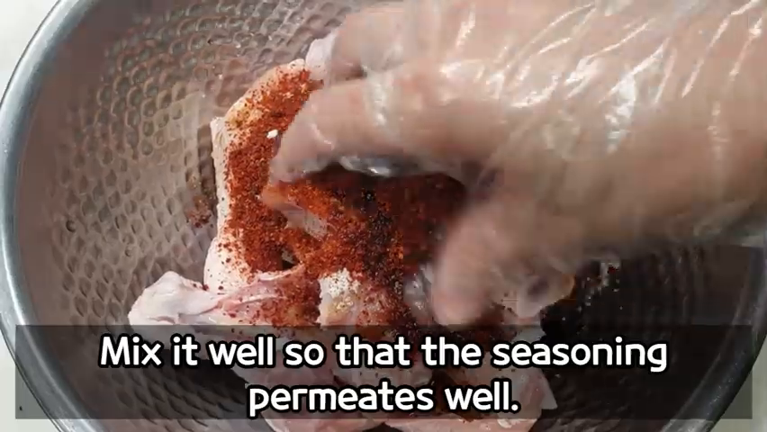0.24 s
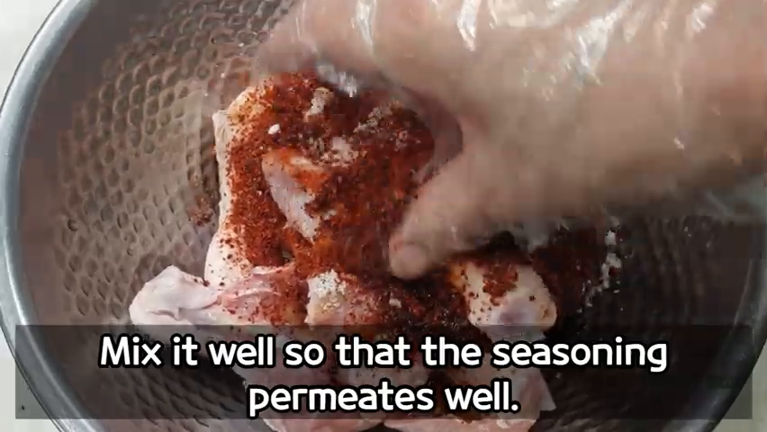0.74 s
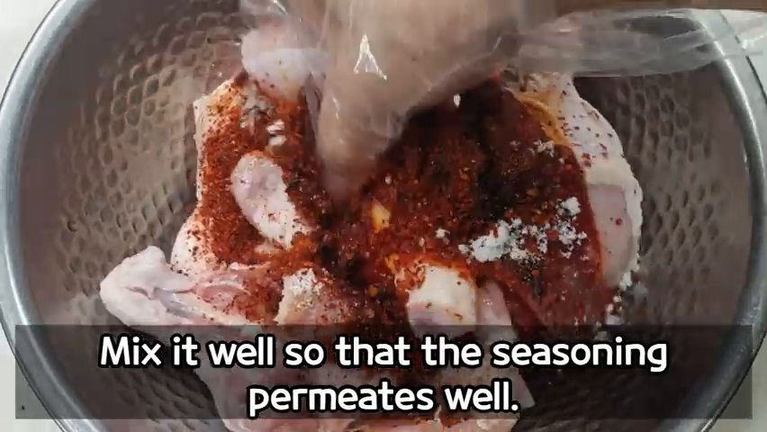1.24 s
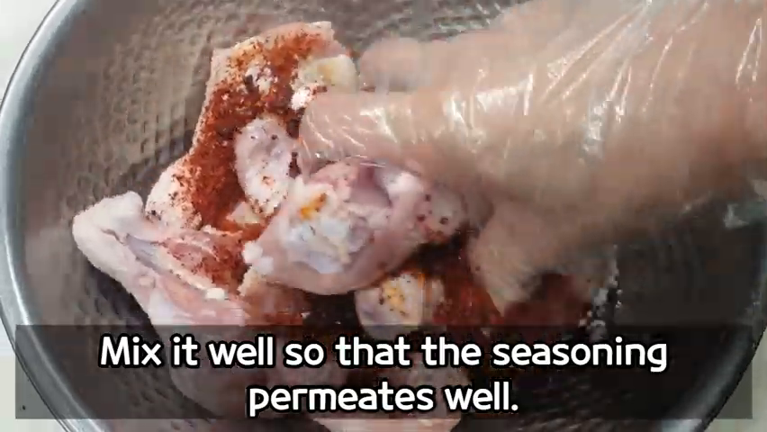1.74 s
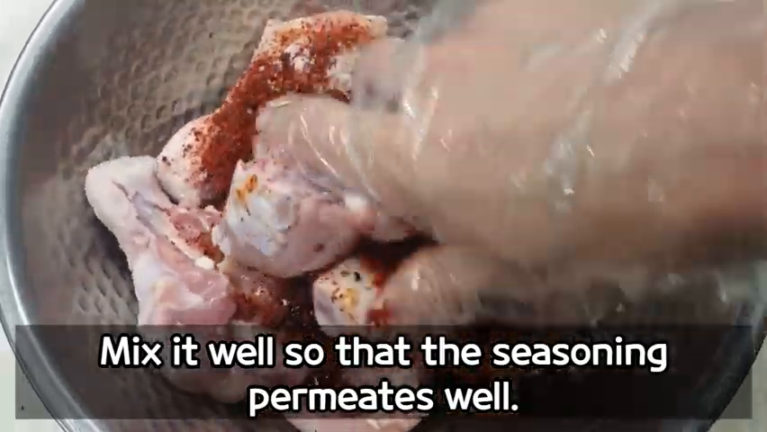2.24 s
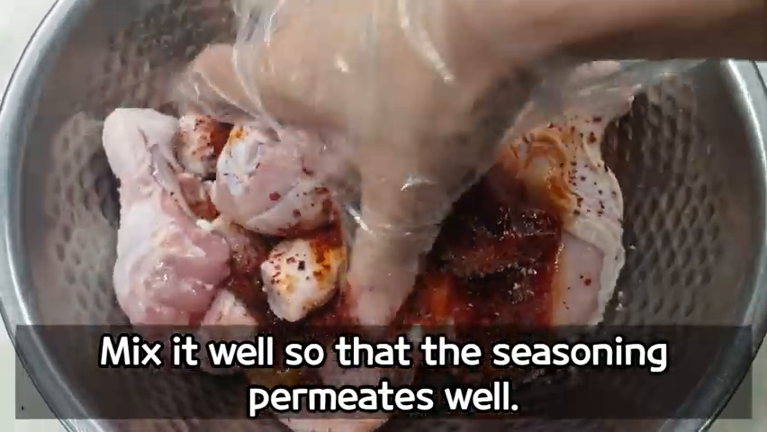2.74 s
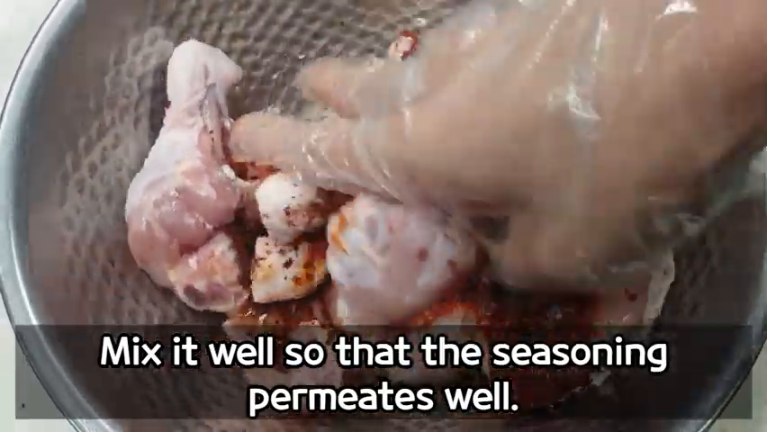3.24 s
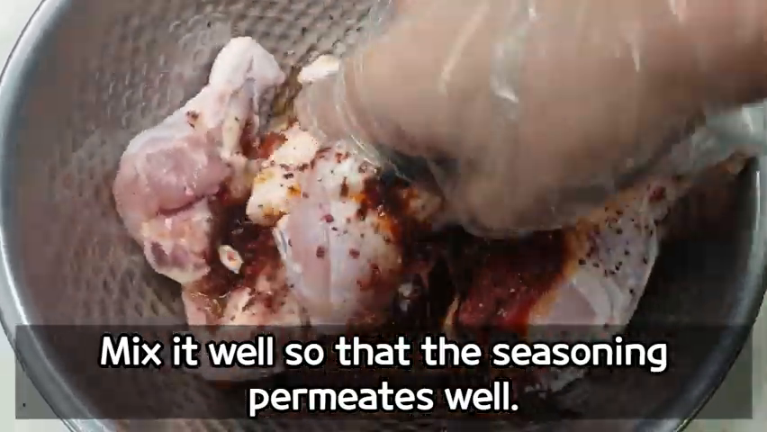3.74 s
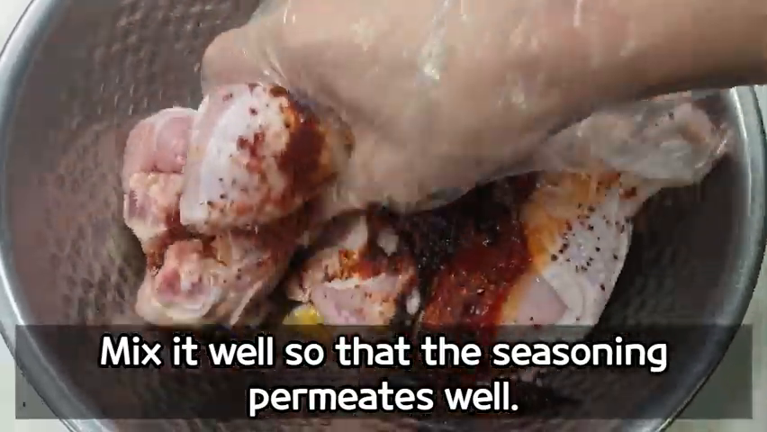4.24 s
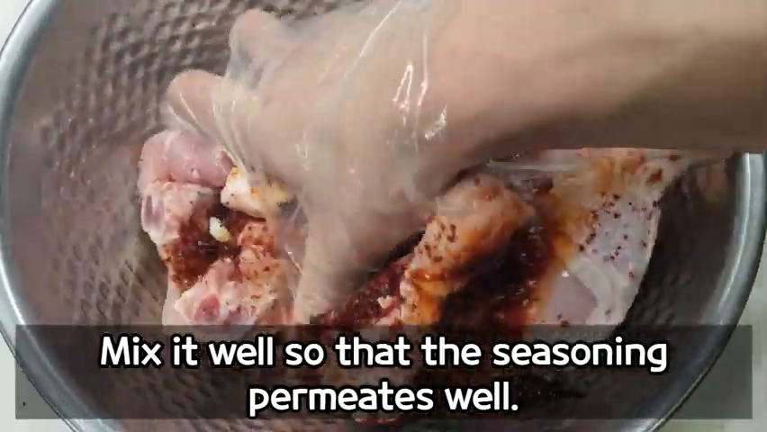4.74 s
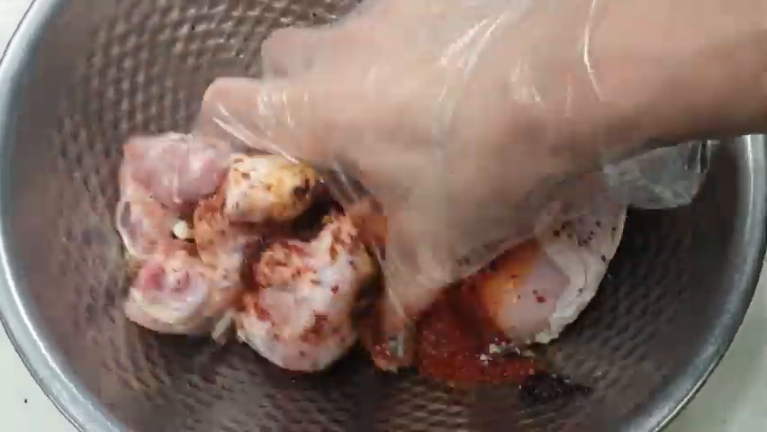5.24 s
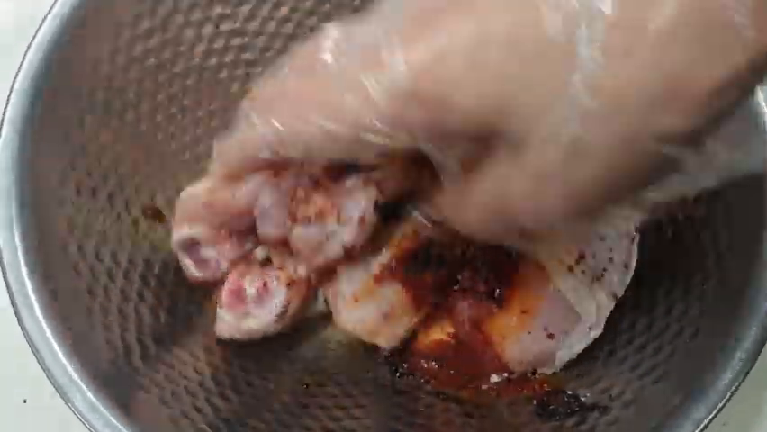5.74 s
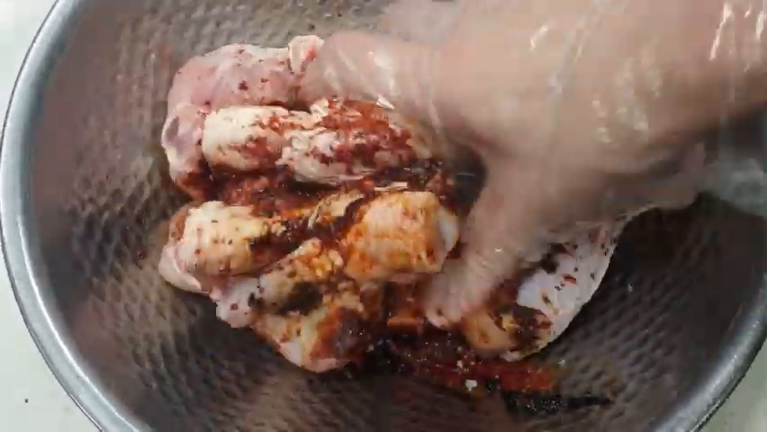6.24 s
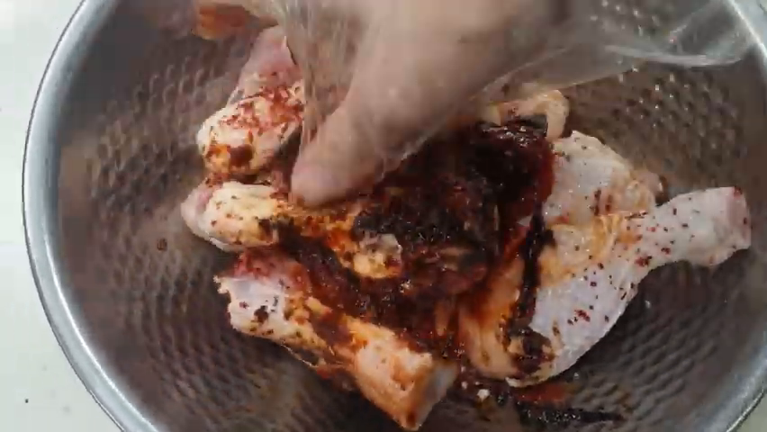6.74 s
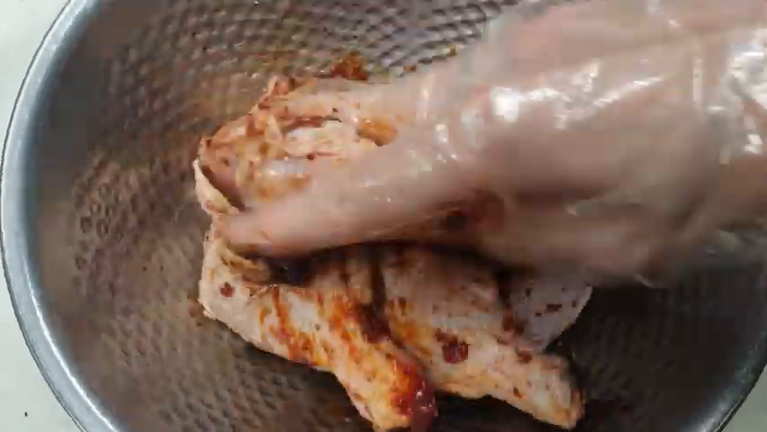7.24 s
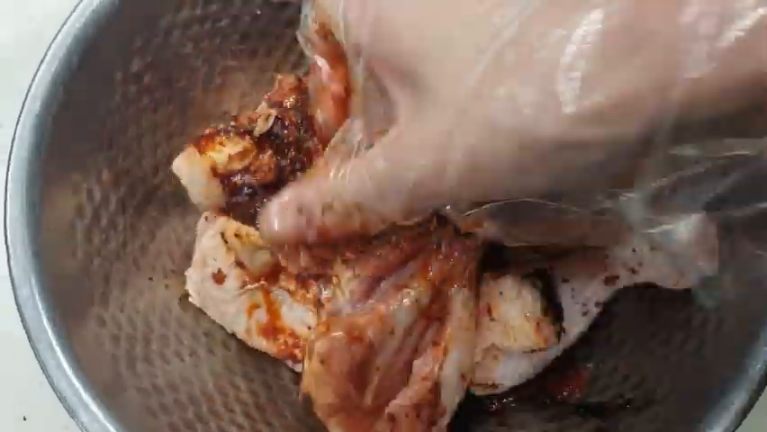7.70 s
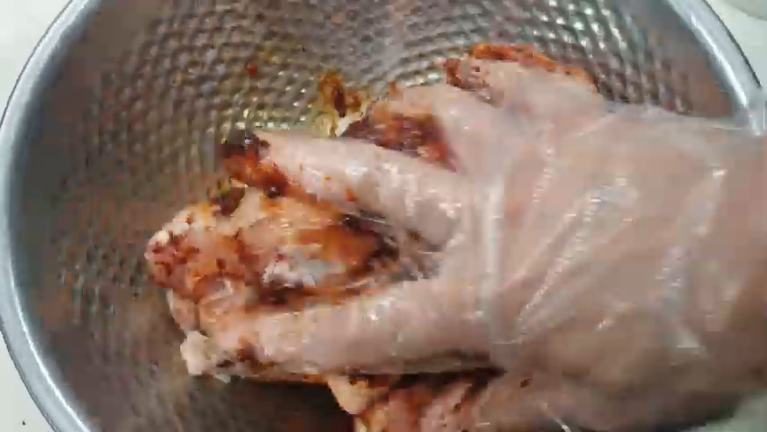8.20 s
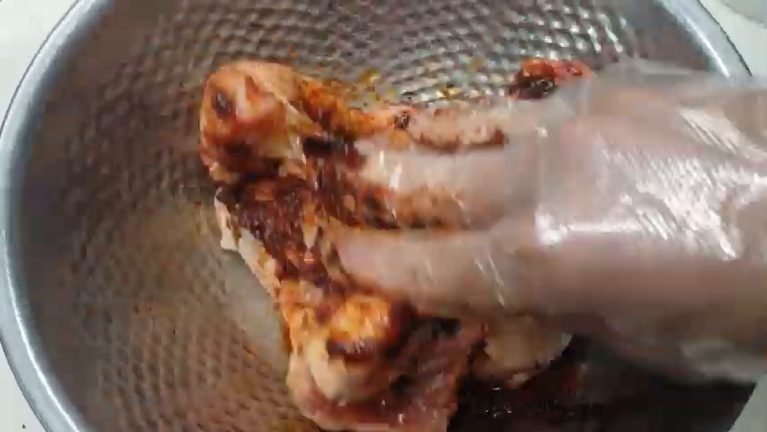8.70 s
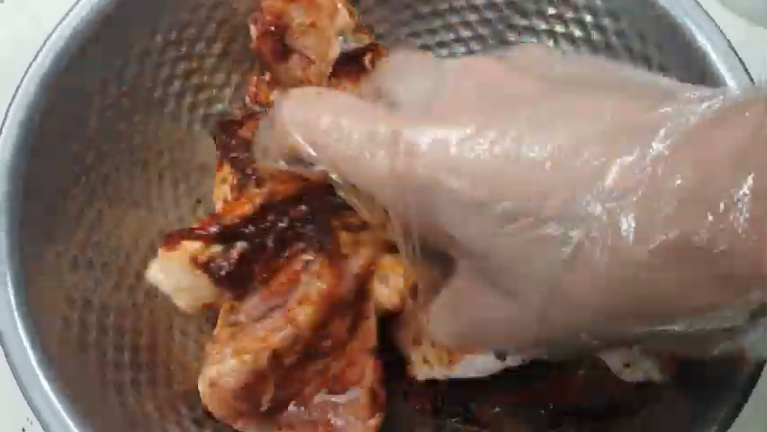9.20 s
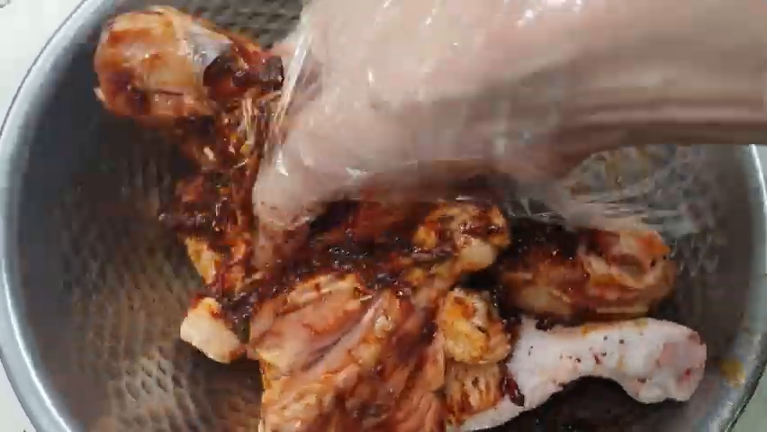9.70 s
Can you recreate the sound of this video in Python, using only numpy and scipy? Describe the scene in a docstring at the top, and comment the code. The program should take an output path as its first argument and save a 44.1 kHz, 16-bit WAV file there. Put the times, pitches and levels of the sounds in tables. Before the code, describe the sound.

Close, busy plastic rustling and sticky squishing of raw meat being mixed, punctuated by low counter thumps and short, muffled metal bowl knocks.

```python
"""A thin plastic glove crinkles over a faint room rumble as a hand kneads wet chicken pieces in a steel bowl.
Glove and paste are clumped clicks that ring at many pitches; snaps are short bursts of ringing noise.
Shoves are lumpy low noise and soft bumps, and knocks set the bowl's own pitches ringing.
Every push thumps through the kitchen counter as a short low tone; echoes of the knocks make the room."""
import sys
import numpy as np
from scipy import signal
from scipy.fft import rfft, irfft
from scipy.io import wavfile

SR = 44100
rng = np.random.default_rng(int(sys.argv[2]) if len(sys.argv) > 2 else 0)


def store_wav(level_fs):
    """Save 16-bit WAV to argv[1]."""
    pcm = np.round(np.clip(np.atleast_2d(level_fs), -1, 1) * 32767)
    wavfile.write(sys.argv[1], SR, pcm.T.astype(np.int16))


def nominal_scale(level):
    """Amplitude ratio for a level in decibels (scalar or array-like)."""
    x = np.asarray(level, float) / 20
    return 10 ** x


N = 439236  # length in samples

# meat drops and pushes felt through the counter, before panning: peak_s, peak_db, pitch_hz
THUMPS = [(1.199, -38.5, 103), (2.372, -40, 97), (2.879, -33.5, 110), (3.418, -32, 107),
          (3.489, -28.5, 100), (3.645, -45, 105), (4.022, -21.5, 116), (4.048, -24.5, 98),
          (4.084, -30.5, 139), (4.581, -26.5, 124), (4.642, -25.5, 112), (4.841, -29, 103),
          (5.144, -28.5, 100), (5.505, -26.5, 97), (5.772, -24, 112.7), (5.8, -31, 113),
          (6.249, -37.5, 103), (6.613, -30, 108), (6.787, -35, 97), (7.018, -31, 112), (7.053, -28.5, 103),
          (7.358, -24.5, 116), (7.57, -35.5, 110), (7.63, -34, 104), (7.824, -25, 108), (8.561, -34.5, 117),
          (8.872, -31, 98), (9.097, -31.5, 108), (9.637, -28.5, 106)]
# ringing pitches of the loaded bowl, damped by the meat: pitch_hz, level_db, fade_by_60_db_s
BOWL = [(290, -2.5, 0.019), (448, -9.5, 0.026), (820, -13.5, 0.054), (900, -2, 0.03), (984, 4.5, 0.036),
        (1152, 8.5, 0.02), (1585, 4.5, 0.016)]
# tone colour laid over the glove's clicks: pitch_hz, gain_db
CRINKLE = [(900, -31), (2600, -8.5), (5000, -5), (7300, -1.5), (8600, -8.5), (10000, -4.5), (12800, -0.5),
           (15500, -1)]


def rms_one(x):
    """Scale to an average (rms) level of 1."""
    return x / np.sqrt(np.mean(x ** 2) + 1e-20)


def in_time(rows):
    """Turn the columns of a timed table into curves with one value per sample."""
    s, *columns = np.transpose(rows)
    return [np.interp(np.arange(N) / SR, s, column) for column in columns]


def at_hz(points, hz, column=1):
    """Read a table column at any pitch, joining its points along a log-frequency axis."""
    points = np.array(points)
    return np.interp(np.log(hz), np.log(points[:, 0]), points[:, column])


def drift(rate_hz):
    """Random wandering of spread 1: noise smoothed twice, worked out at every 40th sample."""
    r = np.exp(-80 * np.pi * rate_hz / SR)
    noise = rng.standard_normal(N // 40 + 2002)
    slow = signal.lfilter([1], [1, -2 * r, r * r], noise)[2000:]  # skip the filter's start
    return np.interp(np.arange(N) / 40, np.arange(len(slow)), rms_one(slow))


def ring(clicks, hz, t60_s):
    """A damped resonance: a unit click sets off a sine of height 1 that fades 60 dB in t60_s."""
    r, w = nominal_scale(-60 / (t60_s * SR)), 2 * np.pi * hz / SR
    return signal.lfilter([0, np.sin(w)], [1, -2 * r * np.cos(w), r * r], clicks + 1e-18)


def band_noise(low_hz, high_hz):
    """Random noise kept between two pitches."""
    band = signal.butter(2, [low_hz, high_hz], "band", fs=SR, output="sos")
    return signal.sosfilt(band, rng.standard_normal(N))


def grains(per_s, size_db, clumps):
    """Three unrelated trains of uneven clicks in shared clumps; clumps multiplies the rate per_s."""
    sizes = nominal_scale(size_db * np.minimum(rng.exponential(1, (3, N)), 5))
    signs = rng.choice([-1, 1], (3, N))
    return sizes * signs * (rng.random((3, N)) < per_s * clumps / SR)


def crackle(clicks, low_hz, high_hz, sharpness, ringing, patchy_db, rate_hz, smear_db=0):
    """Clicks are dealt to sixteen sizes of source; each rings at its own pitch and comes and goes by itself."""
    dealt, out = rng.integers(0, 16, N), 0
    t = np.arange(N) / SR
    for k, hz in enumerate(np.geomspace(low_hz, high_hz, 16)):
        level_db = patchy_db * drift(rate_hz) - smear_db * np.log2(hz / low_hz) * t
        own = clicks * (dealt == k) * nominal_scale(level_db)
        tone = signal.lfilter(*signal.iirpeak(hz, sharpness, SR), own + 1e-18)
        out = out + own + ringing * tone
    return out


def colour(trains, spectrum):
    """One shared and two own trains become a coloured stereo pair whose left-right average has rms 1."""
    # how the two sides compare: pitch_hz, likeness (0 to 1), left_over_right_db
    image = [(100, 0.82, 3.5), (460, 0.53, 8), (840, 0.99, 1), (1520, 0.27, 5), (4250, 0.024, 6),
             (11300, 0.57, 4), (14400, 0.071, 9)]
    right_lag_s = 0.00014
    hz = np.maximum(np.arange(N // 2 + 1) * SR / N, 1)
    mid, *own = rfft(trains) * nominal_scale(at_hz(spectrum, hz))
    alike = np.clip(at_hz(image, hz), 0, 1)
    # only the lows and mids reach the right side late
    lag_s = right_lag_s / (1 + (hz / 5000) ** 4) * np.array([[0], [1]])
    shared = mid * np.exp(-2j * np.pi * hz * lag_s)
    both = np.sqrt(alike) * shared + np.sqrt(1 - alike) * np.array(own)
    balance_db = at_hz(image, hz, column=2) * np.array([[.5], [-.5]])
    out = irfft(both * nominal_scale(balance_db), N)
    return out / np.sqrt(np.mean(out.mean(axis=0) ** 2))


def kneading():
    """Rustle level in dB: the hand's effort, a lull at each regrip, a flurry at each thump."""
    # how hard the hand works, before lulls and flurries: time_s, rustle_db
    effort = [(0.0, -54.5), (0.228, -50.5), (0.243, -41.5), (0.55, -47.5), (1.17, -40.5), (1.36, -50.5),
              (1.47, -42), (2.34, -37.5), (3.25, -38), (3.33, -36.5), (4.8, -36.5), (5.23, -39),
              (7.34, -38.5), (7.39, -42.5), (8.67, -39), (9.82, -42.5)]
    # the fingers let go and grip again: stillest_s, lull_depth_db
    regrips = [(0.45, 7), (0.65, 4.5), (1.48, 7.5), (2.082, 7.5), (2.49, 6), (2.622, 5), (2.739, 4),
               (4.32, 3.5), (5.04, 4), (5.391, 10.5), (5.612, 7.5), (6.025, 10), (6.14, 4.5), (6.421, 9.5),
               (6.723, 8), (6.99, 6.5), (7.215, 5), (8.063, 4), (8.169, 5), (8.735, 5.5), (9.838, 10.5)]
    let_go_db_per_s, grip_db_per_s = 91, 292
    # a thump whose peak is jolt_from_db shakes the glove by jolt_db
    jolt_db, jolt_s, jolt_from_db = 5.5, 0.062, -15.5

    step = np.arange(0, N, 200) / SR  # the swings are worked out at every 200th sample
    s, depth_db = np.transpose(regrips)[:, :, None]
    recovery_db = np.where(step < s, (s - step) * let_go_db_per_s, (step - s) * grip_db_per_s)
    lull = np.maximum(depth_db - recovery_db, 0)

    s, peak_db, _ = np.transpose(THUMPS)[:, :, None]
    distance = (step - s) / jolt_s * np.where(step < s, 2, 1)  # rises twice as fast as it fades
    jolt = jolt_db * np.sqrt(nominal_scale(peak_db - jolt_from_db)) * np.exp(-distance ** 2)
    swing_db = jolt.max(axis=0) - lull.sum(axis=0)
    return in_time(effort)[0] + np.interp(np.arange(N) / SR, step, swing_db)


def glove(clumps):
    """Thousands of tiny creases flip each second; small creases ring high, large ones low."""
    smear_db = 0.264  # paste smears the glove and dulls it: dB per octave per second
    creases = grains(9000, size_db=-0.5, clumps=clumps)
    creases = creases * nominal_scale(2 * smear_db * np.arange(N) / SR)  # makes up for level lost to the dulling
    rustle = crackle(creases, 1850, 13780, sharpness=8, ringing=14, patchy_db=4, rate_hz=22,
                     smear_db=smear_db)
    return colour(rustle, CRINKLE)


def ticks():
    """Clumps of stiffer creases flip, hundreds a second, each ringing briefly."""
    flips = grains(220, size_db=2.5, clumps=nominal_scale(6 * drift(25)))
    ringing = crackle(flips, 2000, 8000, sharpness=6, ringing=5, patchy_db=0.5, rate_hz=8)
    return colour(ringing, CRINKLE)


def wetness():
    """Extra squelch in dB: how much paste is squeezed at each moment."""
    # time_s, extra_squelch_db
    squeezes = [(0.0, -1), (1.19, 1), (1.99, -1), (2.88, 1.5), (3.49, 2.5), (4.17, 2.5), (4.4, -1),
                (4.85, 4), (5.6, 1), (7.19, 2), (7.36, 6.5), (7.65, 3), (9.38, 1), (9.69, 6.5), (9.95, -1)]
    return in_time(squeezes)[0]


def paste(clumps):
    """Wet surfaces peel apart; air pockets pop and ring a few cycles."""
    # tone colour laid over the pops: pitch_hz, gain_db
    squelch = [(120, 4.5), (270, -13.5), (620, -16.5), (900, 4), (1320, 1), (1700, 1), (2600, -10),
               (5000, -3)]
    pops = grains(1300, size_db=2.5, clumps=clumps)
    wet = crackle(pops, 332, 2280, sharpness=8.0, ringing=8.6, patchy_db=4.0, rate_hz=13.2)
    return colour(wet, squelch)


def rumble(knead_db, wet_db):
    """Low coloured noise below it all; harder kneading also shakes the counter and lifts it."""
    # tone colour of the noise: pitch_hz, gain_db
    rumble_spectrum = [(20, -61), (40, -7.5), (90, 0), (180, -13.5), (420, -14.5), (700, -19)]
    shake_db = -55 + 0.68 * (knead_db + wet_db + 46) + 2.0 * drift(30.0)
    return nominal_scale(shake_db) * colour(rng.standard_normal((3, N)), rumble_spectrum)


def snaps():
    """Folds pop loose: milliseconds of rattling film around one pitch, over a broad crack."""
    # folds of the glove popping loose, before panning: start_s, peak_db, pitch_hz, rattle_fade_s
    folds = [(0.061, -40, 6900, 0.003), (0.673, -31, 7100, 0.002), (2.6502, -34, 6400, 0.002),
             (2.915, -24, 13000, 0.026), (3.994, -15, 5700, 0.0087), (4.167, -21, 5500, .002),
             (4.6035, -21, 6000, 0.028), (5.253, -41, 6100, 0.0028), (5.895, -24.5, 7230, 0.011),
             (6.169, -20, 14200, .002), (6.2073, -24.5, 5740, 0.0082), (6.446, -20, 7450, 0.0043),
             (6.604, -24.5, 6950, 0.0026), (6.7539, -28, 4800, 0.023), (7.3217, -18.5, 6800, 0.012),
             (7.7236, -13, 13100, 0.0018), (7.7565, -20, 5860, 0.01)]
    out, t = np.zeros((2, N)), np.arange(SR // 16) / SR
    for s, peak_db, hz, rattle_s in folds:
        noise = rng.standard_normal((2, len(t)))
        envelope = (1 - np.exp(-t / 0.00087)) * np.exp(-t / rattle_s)
        rattle = (noise + noise[0]) * envelope  # the sides share part of the noise
        crack = rms_one(np.diff(rattle, prepend=0))
        burst = rms_one(ring(rattle, hz, 10.3 / hz)) + 0.09 * crack
        burst = nominal_scale(peak_db) * burst / np.abs(burst).max(axis=1, keepdims=True)
        at = round(s * SR)
        out[:, at:at + len(t)] += burst[:, :N - at]
    return out * nominal_scale([[3], [-3]])  # louder on the left


def shoves():
    """Meat shoved along and the bowl juddering on the counter: lumpy low noise and soft bumps on the bowl."""
    # the heap is shoved, before panning: start_s, length_s, judder_db
    pushes = [(0.917, 0.14, -51.5), (1.19, 0.1, -54), (2.785, 0.14, -41.5), (3.422, 0.25, -43.5),
              (4.138, 0.13, -51.5), (4.57, 0.093, -39), (4.745, 0.173, -46.5), (7.08, 0.33, -48.5),
              (8.535, 0.1, -48)]
    edge_s = 0.0074  # time to rise; the fade takes five times as long
    bumps_db, bump_hz = -5, 450  # bumps against judder; softness of the bumps
    t, bearing = np.arange(N) / SR, 0
    for s, length_s, db in pushes:
        nearest_edge_s = np.minimum(t - s, (s + length_s - t) / 5)
        bearing = bearing + nominal_scale(db) * np.clip(nearest_edge_s / edge_s + 1, 0, 1)
    judder = band_noise(72, 146)
    # pieces bump the bowl wall during a shove
    soft = np.exp(-2 * np.pi * bump_hz / SR)
    hits = grains(260, size_db=2.0, clumps=nominal_scale(3.2 * drift(25)))[0]
    hits = signal.lfilter([1], [1, -soft], hits + 1e-18)
    bumps = sum(nominal_scale(db) * ring(hits, hz, t60_s) for hz, db, t60_s in BOWL)
    return bearing * (rms_one(judder) + nominal_scale(bumps_db) * rms_one(bumps))


def knocks():
    """A padded, chattering contact with a wet smack behind it strikes each bowl pitch with its own strength."""
    # bones and knuckles on the bowl, fleshy ones duller, before panning: start_s, peak_db, tilt_db_per_octave
    hits = [(1.189, -30.5, -9), (2.814, -29.5, -6), (2.861, -25.5, -2), (3.056, -27, 2),
            (3.408, -24.5, -11.5), (3.475, -22.5, -1), (3.994, -23.5, -7.5), (4.015, -18.5, 7),
            (4.052, -23, -8), (4.119, -28, 18), (4.207, -29, 5), (4.269, -33.5, 40), (4.602, -26, -10),
            (4.711, -28, 46), (4.839, -30, 8), (5.126, -28, -2), (5.763, -27, -7), (5.791, -25, 8),
            (7.036, -26, 2), (7.164, -36, -15), (7.258, -36, -15), (7.286, -36, -11), (7.316, -25, -10),
            (7.334, -18.5, -6.5), (7.391, -29, 6), (7.461, -28, -8), (8.552, -35, -9), (9.664, -36, -1)]
    contact_s, smack_s = 0.0013, 0.011
    uneven_db, detune = 3, .035  # spread of strengths; spread of pitch as a fraction
    out, t = np.zeros(N), np.arange(SR // 8) / SR
    push = t * (np.exp(-t / contact_s) + 0.014 * np.exp(-t / smack_s))
    for s, peak_db, tilt_db in hits:
        force = rng.standard_normal(len(t)) * push
        shift = 1 + detune * rng.standard_normal()  # the shifting load detunes the bowl a little
        blow = 0
        for hz, db, t60_s in BOWL:
            strength_db = db + tilt_db * np.log2(hz) + uneven_db * rng.standard_normal()
            blow = blow + nominal_scale(strength_db) * ring(force, hz * shift, t60_s)
        at = round(s * SR)
        out[at:at + len(t)] += nominal_scale(peak_db) * blow / np.abs(blow).max()
    return out


def thumps():
    """Soft flesh loads the counter over a cycle or two; the panel is quickly damped and hums on a little."""
    # ringing pitches of the counter panel: pitch_hz, level_db, fade_by_60_db_s
    panel = [(76.7, -1.5, 0.77), (97, 12, 0.098), (158.8, 14, 0.27)]
    swell_s, fade_s = 0.0102, 0.013
    after_db, slap_db = -40, -21  # the panel's hum; the wet slap
    out, load, t = np.zeros(N), np.zeros(N), np.arange(SR // 6) / SR
    rise = np.sin(np.pi / 2 * t / swell_s) ** 2
    fall = np.exp(-np.maximum(t - swell_s, 0) ** 1.36 / fade_s ** 1.245)
    shape = np.where(t < swell_s, rise, fall)
    for s, peak_db, hz in THUMPS:
        at = round((s - swell_s) * SR)
        out[at:at + len(t)] += nominal_scale(peak_db) * shape * np.sin(2 * np.pi * hz * t)
        load[at:at + len(t)] += nominal_scale(peak_db) * shape
    out += sum(nominal_scale(after_db + db) * ring(out, hz, t60_s) / 10 for hz, db, t60_s in panel)
    # the wet meat slaps and shifts while it bears down
    out += nominal_scale(slap_db) * load * rms_one(band_noise(150, 260))
    # the panel is too small to radiate deep bass
    return signal.sosfilt(signal.butter(2, 50, "high", fs=SR, output="sos"), out)


def kitchen(x):
    """Room echo: six feedback delays on each side, duller on every round, stepped block by block."""
    t60_s = 0.11  # echo time for a 60 dB fade, before the dulling
    out, dull = np.zeros((2, N)), np.exp(-2 * np.pi * 3000 / SR)
    lags = (rng.uniform(0.011, 0.021, 12) * SR).astype(int)
    for k, lag in enumerate(lags):
        loop, gain, state = x.copy(), nominal_scale(-60 * lag / SR / t60_s), [0.]
        for i in range(lag, N, lag):
            back, state = signal.lfilter([gain * (1 - dull)], [1, -dull], loop[i - lag:i], zi=state)
            loop[i:i + lag] += back[:N - i]
        out[k % 2] += (loop - x) * (-1) ** (k // 2)  # echoes only, with mixed signs
    return out


def scene():
    """Hand, bowl and counter slightly to the left, in a small kitchen."""
    knead_db, wet_db = kneading(), wetness()
    clumps = nominal_scale(2.0 * drift(45) + 3.0 * drift(150))  # shared by glove and paste
    rustle = glove(clumps) + nominal_scale(-8) * ticks()
    squelching = nominal_scale(-11.0 + wet_db) * paste(clumps)
    hand = nominal_scale(knead_db) * (rustle + squelching)
    low = rumble(knead_db, wet_db)
    blows = knocks()
    bowl_and_counter = (shoves() + blows + thumps()) * nominal_scale([[1.6], [-1.6]])
    echo = nominal_scale(-7.5) * kitchen(blows)
    return hand + low + snaps() + bowl_and_counter + echo


def top_cut(x):
    """Nothing passes above the cut-off."""
    return signal.sosfilt(signal.butter(12, 16810, fs=SR, output="sos"), x)


def record(dry):
    """A steep low-pass filter cuts the top of the treble."""
    low_pass = signal.ellip(12, .5, 80, 15950, fs=SR, output="sos")
    mix = signal.sosfilt(low_pass, dry)
    return top_cut(mix)


dry = scene()
out = record(dry)
store_wav(out)
```